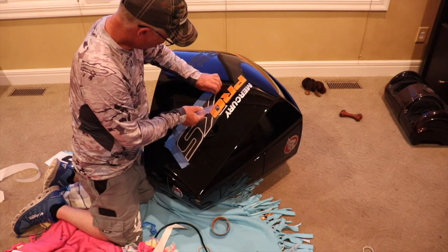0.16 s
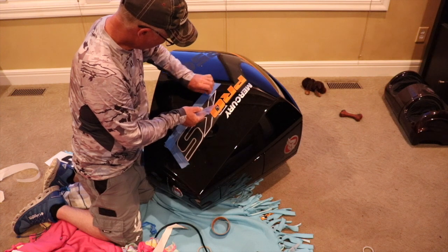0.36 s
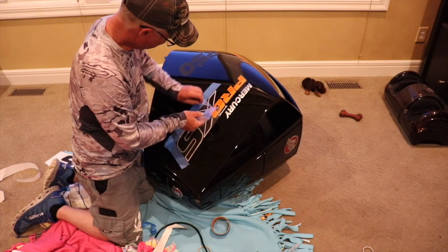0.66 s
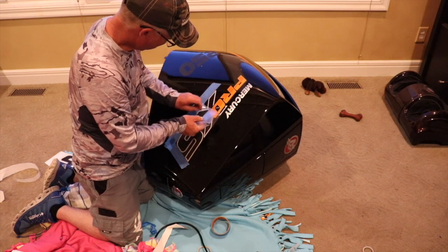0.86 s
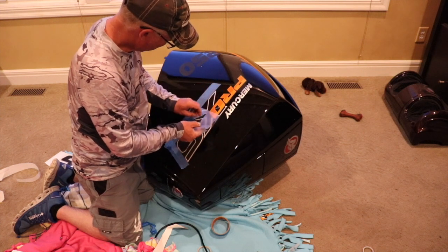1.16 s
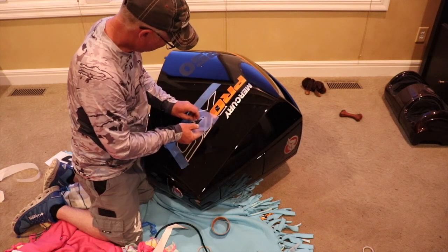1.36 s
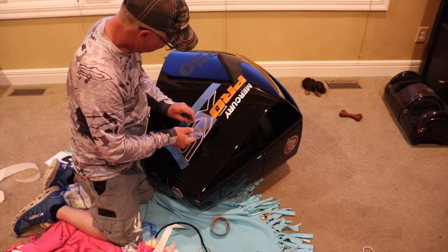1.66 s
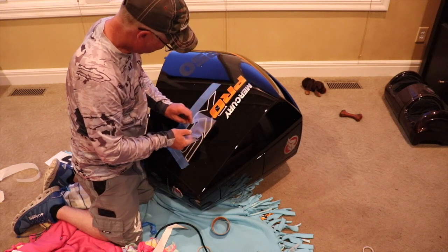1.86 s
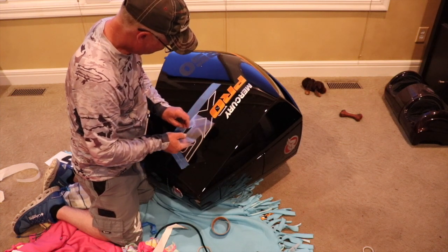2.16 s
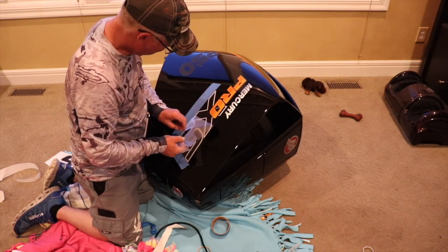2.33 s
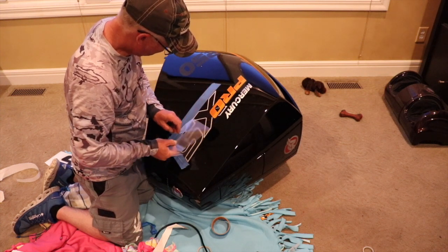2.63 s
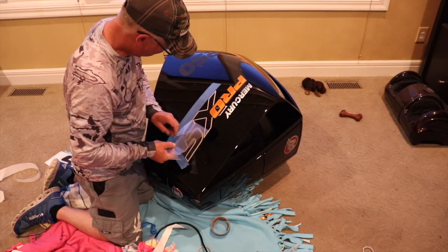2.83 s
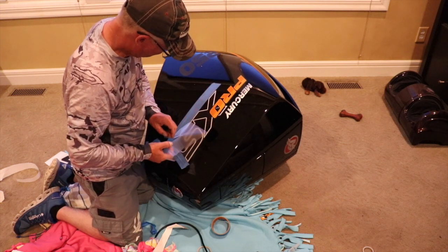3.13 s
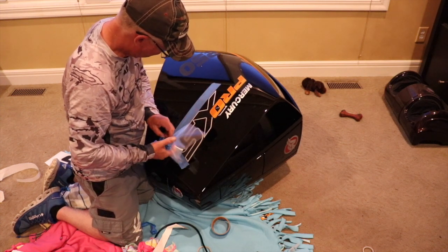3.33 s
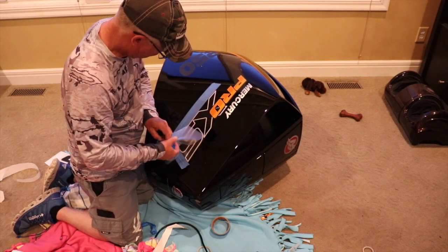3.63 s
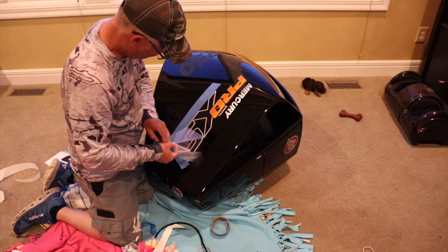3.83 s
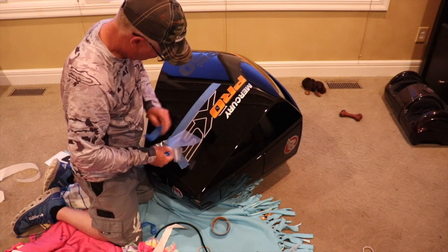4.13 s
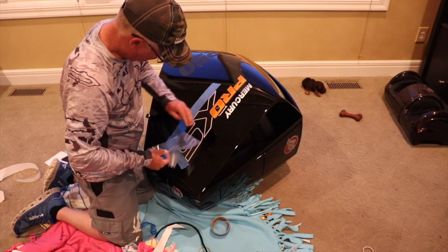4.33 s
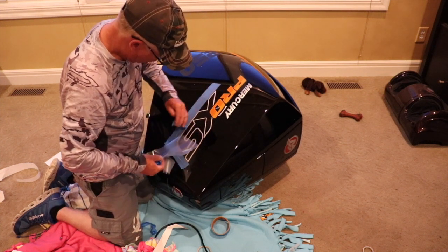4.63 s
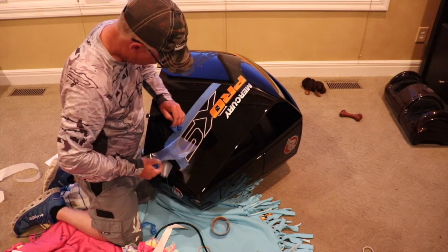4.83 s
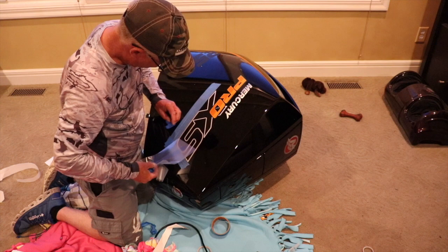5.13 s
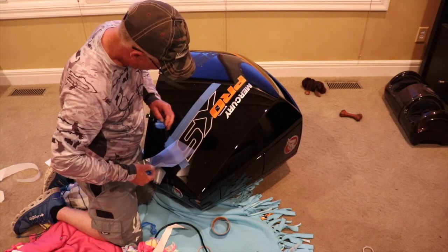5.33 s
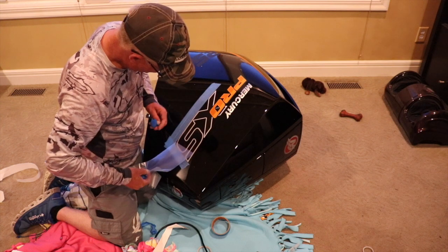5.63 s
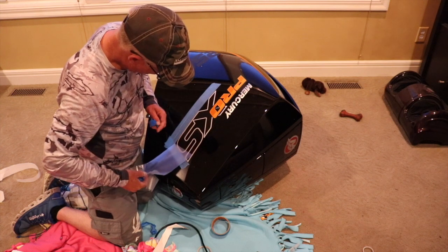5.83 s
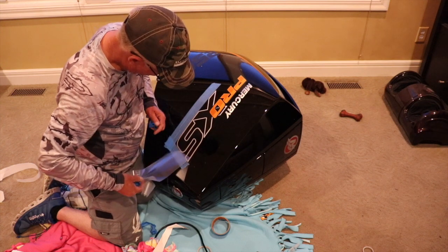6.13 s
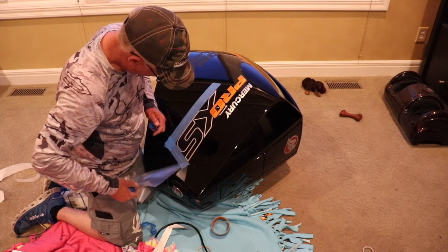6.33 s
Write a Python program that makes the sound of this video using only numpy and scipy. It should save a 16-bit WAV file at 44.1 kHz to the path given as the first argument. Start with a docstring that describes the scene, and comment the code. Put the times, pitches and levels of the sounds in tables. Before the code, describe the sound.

In a bare room with a faint steady hiss, hands pull tape and stiff film off a hollow shell. Bright snaps and sticky crackles come in uneven bursts with brief lulls, thickest a little past the middle. The tugs draw a soft hollow resonance from the shell, and each sound has a slight fluttering echo. The microphone seems fairly near.

```python
"""Peeling a decal

Hands peel stiff backing film and masking tape off a decal on a fibreglass cover in a bare carpeted room.
Creases snap, the glue lets go in runs of tiny crackles and a low, hollow ring comes with each tug. Each
sound stutters in fading, inverted repeats every 1/60 s, laid over the room's sound and a faint hiss."""
import sys
import numpy as np
from scipy import signal
from scipy.fft import rfft, irfft, next_fast_len
from scipy.io import wavfile
from scipy.ndimage import uniform_filter1d

SR = 44100
rng = np.random.default_rng(int(sys.argv[2]) if len(sys.argv) > 2 else 0)


def unload_audio(sound):
    """Save the sound as a 16-bit wav file, at the path given as the first command line argument."""
    columns = np.transpose(np.atleast_2d(sound))
    # keep every value between -1 and 1, then stretch to whole-number steps
    steps = np.round(np.clip(columns, -1, 1) * 32767)
    wavfile.write(sys.argv[1], SR, steps.astype(np.int16))


N = 286209

# The colour of the hiss. Each row: frequency in Hz, relative density in dB.
HISS_COLOUR = [(25, 9), (60, 8.5), (130, 6.5), (220, 4.5), (380, 2), (600, -5.5), (1700, -8), (2500, -9.5),
               (6000, -13), (11000, -21), (16500, -17.5)]
# Stereo width of hiss and tail. Each row: frequency in Hz, left-right likeness from 0 to 1.
STEREO_LIKENESS = [(60, 0.44), (250, 0.95), (500, 0.61), (1000, 0.044), (2000, 0.035), (15000, 0.0061)]
# Creases buckling. Each row: time in seconds, dry peak in dB, centre in Hz, spread in octaves.
CREASES = [(0.019, -30.5, 2270, 0.62), (0.181, -40.5, 6200, 0.34), (.2699, -26, 6060, .6),
           (.2785, -24, 7400, 0.34), (0.287, -9.5, 6900, 0.57), (0.752, -32, 6000, 0.36),
           (0.759, -29, 6400, 0.45), (0.7763, -17, 5500, 0.58), (.7961, -20, 2000, 0.88),
           (.8179, -11.5, 6300, 0.49), (.8293, -19, 5500, 0.39), (0.8486, -8, 5060, 0.68),
           (0.8715, -22, 5000, 1.1), (0.88, -18, 7000, 0.67), (1.0211, -29, 3870, 0.43),
           (1.2873, -42.5, 3500, 0.54), (1.4162, -31.5, 5200, 0.69), (1.4222, -38, 3480, 0.26),
           (1.425, -19.5, 3070, 0.3), (1.4376, -28, 2160, 0.88), (1.4708, -22, 2050, 0.97),
           (1.5045, -48, 1900, 0.98), (1.7364, -31.5, 4860, 0.54), (1.8643, -36, 8100, 0.88),
           (1.867, -28, 10600, 0.33), (1.8835, -33.5, 9800, 0.76), (2.2465, -23, 5800, .8),
           (2.2501, -20.5, 5230, 0.71), (2.2739, -12, 7060, 0.77), (2.5586, -37, 7600, 1.1),
           (2.6466, -40, 7200, 0.74), (2.678, -45, 1920, 0.15), (3.2, -47, 2250, 0.21),
           (3.2201, -41.5, 5900, 0.41), (3.2621, -41, 4700, .5), (3.2718, -35, 4930, 0.19),
           (3.2784, -46, 4900, .12), (3.2934, -32.5, 5030, 0.15), (3.2954, -35, 4700, 0.12),
           (3.3018, -41, 4770, 0.12), (3.361, -38, 4200, .8), (3.3675, -36, 4300, .7),
           (3.377, -14.5, 4700, .6), (3.3933, -7.5, 4380, 0.68), (3.5963, -23.5, 10900, 0.45),
           (3.732, -37, 2900, 0.66), (3.7523, -34, 2700, 0.88), (3.769, -36, 5170, 0.43),
           (3.8172, -31, 3500, 0.88), (3.8735, -21, 2920, 1), (3.8992, -24, 3900, 0.85),
           (3.9063, -20.5, 2640, 0.77), (3.9151, -21.5, 2320, 0.65), (3.9236, -23, 2350, 0.65),
           (4.0009, -25.5, 2780, 1), (4.0045, -25, 5440, 0.65), (4.0637, -20.5, 2130, 0.42),
           (4.0935, -21, 2620, 0.48), (4.1066, -17, 11000, 1), (4.12, -14, 9000, 0.65),
           (4.23, -28, 3230, 0.81), (4.2509, -33, 4300, 0.84), (4.3859, -41, 7040, 0.62),
           (4.4864, -27, 3520, 0.3), (4.4973, -47, 4100, 0.42), (4.56, -36, 6200, 0.32),
           (4.6663, -39, 4200, 0.25), (4.6879, -32, 6800, 0.34), (4.6992, -40, 6000, 0.46),
           (4.7299, -24.5, 4500, 0.3), (4.7462, -25.5, 4700, 0.38), (4.9155, -28, 6200, 0.91),
           (4.9232, -26, 5260, 0.56), (4.9325, -21, 11400, 0.3), (4.9352, -24, 10700, 0.56),
           (4.9446, -20, 8200, 0.74), (4.9516, -27, 7640, .5), (4.9574, -16, 7400, 0.64),
           (4.9617, -7.5, 7800, 0.51), (5.082, -36, 1560, 0.2), (5.145, -34.5, 1750, 0.43),
           (5.1719, -31.5, 7360, 0.77), (5.2124, -28, 4230, 0.3), (5.2313, -28, 9000, 0.65),
           (5.2802, -34.5, 3930, 0.65), (5.6233, -32, 3940, 0.76), (5.776, -43, 2400, .4),
           (5.903, -38.5, 3220, 0.65), (5.9876, -35, 9800, 0.88), (6.251, -46, 7260, 0.7),
           (6.2593, -22.5, 7400, .6), (6.2767, -28.5, 7200, 0.65), (6.349, -38, 6500, 0.75),
           (6.3637, -24, 7200, .6), (6.3805, -29, 6660, .6), (6.4385, -30, 6000, 0.88),
           (6.448, -28, 6200, .7), (6.4516, -22.5, 2930, 0.54), (6.4544, -18.5, 4800, 0.58)]
# Tugs at the glue. Each row: peak time in seconds, rise and base fall in dB per second, crackle
# centre in Hz, then the dry peak levels in dB of crackle, fine film, broad folds and hollow ring.
GLUE_TUGS = [(0.028, 298, 189, 2580, -66, -72, -63.5, -61.5), (.19, 300, 60, 5000, -81, -84, -85, -91),
             (0.288, 1198, 478, 4600, -29, -31.5, -36.5, -42),
             (0.318, 900, 98, 4000, -44, -49.5, -45.5, -43), (0.629, 300, 43, 3300, -73, -67, -71, -59.5),
             (0.782, 510, 115, 2700, -42.5, -44, -49.5, -68),
             (0.829, 503, 102, 3520, -39, -36.5, -41.5, -48), (1.43, 896, 76, 3000, -69, -62.5, -55.5, -52),
             (1.474, 898, 314, 2830, -56, -80, -42.5, -40.5), (1.55, 300, 48, 2700, -93, -72, -83, -82),
             (1.736, 708, 114, 4030, -69, -61, -87, -85), (1.875, 900, 106, 4000, -61, -62.5, -67, -73),
             (2.268, 987, 340, 3470, -37, -37, -56.5, -54), (2.308, 600, 75, 3240, -55, -61.5, -57, -54),
             (2.67, 189, 100, 2140, -68.5, -69, -72, -62), (3.22, 306, 700, 2200, -66, -67, -92, -82),
             (3.295, 502, 200, 4260, -56, -58, -56.5, -85), (3.34, 300, 60, 2600, -55.5, -66, -73, -75),
             (3.381, 1100, 109, 3000, -37, -43, -45, -49.5), (3.61, 294, 83, 3600, -59.5, -54.5, -67, -66),
             (3.74, 150, 170, 2440, -61.5, -79, -59, -64), (3.832, 712, 91, 2400, -47, -50, -50, -59.5),
             (3.904, 803, 96, 2510, -44.5, -53, -50.5, -43), (4.07, 702, 244, 2350, -51, -53.5, -69, -66),
             (4.122, 900, 157, 2940, -45, -51, -52, -52), (4.38, 91, 37, 3420, -66, -68.5, -69, -66),
             (4.483, 802, 63, 3340, -65, -64, -60, -59.5), (4.738, 244, 354, 4070, -48, -49, -59, -57),
             (4.79, 200, 43, 3740, -59.5, -65, -59, -59.5),
             (4.961, 350, 115, 4700, -42.5, -40.5, -62.5, -56),
             (5.22, 99, 62, 4050, -59, -60.5, -61.5, -67.5), (5.623, 280, 96, 4500, -59, -65, -67.5, -69),
             (5.77, 148, 162, 3200, -62.5, -65, -70.5, -74),
             (5.899, 400, 147, 2980, -61.5, -60.5, -68.5, -69),
             (6.038, 200, 166, 3000, -61.5, -67.5, -78, -96),
             (6.272, 695, 172, 4260, -52.5, -52, -64.5, -63),
             (6.38, 250, 280, 4800, -48.5, -55, -58.5, -57), (6.453, 1793, 398, 2760, -39.5, -45, -53, -48)]
# Multipliers on a tug's fall rate, in order: crackle, film, folds, ring.
FALL_FACTORS = [0.9, 1.3, 0.73, 2.05]
# The textures of crackle, film and folds. Each row: spread in octaves, grains per second.
GRAIN_TEXTURES = [(0.332, 1000), (.4, 1700), (.55, 600)]
# Pitches of the low, hollow ring heard with each tug.
# Each row: pitch in Hz, relative level in dB, seconds to fall 60 dB.
RING_PITCHES = [(228, -12, .1), (269, -3, .36), (330, -4, .07), (392, -1, .08), (447, -1, .06),
                (520, -2, .06), (696, -6, .08)]
# First reflections. Each row: left and right delay in seconds, left and right level in dB.
REFLECTIONS = [(.0014, .0015, -10, -8), (.004, .0032, -16, -15), (.0074, .0069, -15, -13),
               (.0112, .0108, -17, -14), (.0188, .0188, -16, -16), (.0283, .026, -18, -15)]
# The length of the room's tail. Each row: frequency in Hz, seconds to fall 60 dB.
TAIL_DECAY = [(150, 1), (400, 1), (1000, 0.4), (2800, 0.45), (7000, 0.61), (15000, 0.15)]
# The colour of the tail. Each row: frequency in Hz, relative level in dB.
TAIL_COLOUR = [(150, -5), (600, -2), (2000, 0), (6000, 0), (11000, 1), (16000, 1)]
# The microphone's tone. Each row: frequency in Hz, gain in dB.
MICROPHONE_EQ = [(25, -40), (60, -20), (120, -8), (250, 0), (2000, 0), (9000, 0), (11000, -4), (13000, -1),
                 (16000, -2)]

RIGHT_LAGS_S = (.00001, .00003, .00005)  # right channel's lag for each of three places on the sheet
HISS_DB, LEFT_TREBLE_DB, TOP_HZ = -60, -2.5, 15900
FILM_HZ, FOLDS_HZ = 11000, 1188
SAG_OCTAVES_PER_S = 0.25  # the crackle dulls after each peak
STUTTER_S, STUTTER_DB = 1 / 60, -7.5  # spacing of the repeats, level step from one to the next
TAIL_DB = -2  # the tail's energy against the direct sound
BLOOM_DB, BLOOM_S = 0.5, 0.037  # lift at the start of the tail, and its time constant


def gain_of(db):
    return 10 ** (np.asarray(db) / 20)


def unit_rms(x):
    return x / np.sqrt(np.mean(x ** 2) + 1e-20)


def curve_at(points, hz):
    """A table's value at hz, interpolated on a log-frequency axis."""
    f, value = np.transpose(points)
    return np.interp(np.log(hz + 1), np.log(f + 1), value)


def coloured(x, gain):
    """Filters x by gain(Hz)."""
    size = next_fast_len(x.shape[-1])
    return irfft(rfft(x, size) * gain(np.fft.rfftfreq(size, 1 / SR)), size)[..., :x.shape[-1]]


def bell(hz, octaves):
    """A bell EQ curve with wide skirts and a pink tilt."""
    return lambda f: (1 + (np.log2((f + 1) / hz) / octaves) ** 2 / 6) ** -2 / np.sqrt(f + 100)


def stereo_noise(seconds, db_field, size):
    """Noise shaped by db_field(Hz, s), narrow in the bass and wide in the treble."""
    hop, hz = size // 4, np.fft.rfftfreq(size, 1 / SR)[:, None]
    frames = round(seconds * SR) // hop + 5
    a, b, c, d = rng.standard_normal((frames, len(hz), 4)).T
    left, unrelated = a + 1j * b, c + 1j * d
    likeness = np.clip(curve_at(STEREO_LIKENESS, hz), 0, 1)
    spectra = np.array([left, likeness * left + np.sqrt(1 - likeness ** 2) * unrelated])
    spectra *= gain_of(db_field(hz, np.arange(frames) * hop / SR))
    return signal.istft(spectra, nperseg=size, noverlap=size - hop)[1][:, :round(seconds * SR)]


def hiss():
    """A faint, steady bed of noise, weighted to the lows."""
    noise = stereo_noise(N / SR + .1, lambda hz, s: curve_at(HISS_COLOUR, hz), size=4096)
    return gain_of(HISS_DB) * unit_rms(noise[:, :N])


def crease_snaps():
    """Each crease buckles with a sharp tick and a millisecond of rattle, coloured by its size."""
    out, t = np.zeros(N + 600), np.arange(-100, 500) / SR
    rattles = rng.standard_normal((len(CREASES), len(t)))
    for (s, db, hz, octaves), rattle in zip(CREASES, rattles):
        burst = (t == 0) + .3 * rattle * (t > 0) * np.exp(-abs(t) / .0008)
        burst = coloured(burst, bell(hz, octaves))
        at = max(round(s * SR) - 100, 0)
        out[at:at + len(t)] += gain_of(db) * burst / abs(burst).max()
    return out[:N]


def pull():
    """Tugs swell and die away, adding in power. Returns the crackle's centre in Hz and four gains."""
    t = np.arange(0, N / SR + .002, .001)
    power, weighted_octave = 0, 0
    for s, rise, fall, hz, *peak_db in GLUE_TUGS:
        before, after = np.maximum(s - t, 0), np.maximum(t - s, 0)
        tug_power = gain_of(np.c_[peak_db] - rise * before - fall * np.c_[FALL_FACTORS] * after) ** 2
        power += tug_power
        weighted_octave += tug_power[0] * (np.log2(hz) - SAG_OCTAVES_PER_S * after)
    crackle_hz = 2 ** (weighted_octave / power[0])
    return [np.interp(np.arange(N) / SR, t, curve) for curve in (crackle_hz, *np.sqrt(power))]


def glue_slips(per_s):
    """The glue lets go in random ticks of either sign; a few are large."""
    size = gain_of(4 * np.minimum(rng.exponential(1, N), 3))
    return unit_rms(size * rng.choice([-1., 1.], N) * (rng.random(N) < per_s / SR))


def sheet_grains(hz, octaves, per_s):
    """Slips heard in the sheet: ticks through a bell centred on hz, steady or sweeping."""
    f, s, spectra = signal.stft(glue_slips(per_s), SR, nperseg=256)
    centre_hz = np.interp(s, np.arange(N) / SR, hz * np.ones(N))
    tone = bell(centre_hz, octaves)(f[:, None])
    return unit_rms(signal.istft(spectra * tone / np.linalg.norm(tone, axis=0), nperseg=256)[1][:N])


def hollow_ring(envelope):
    """A low, hollow ring under each tug: ticks set off a cluster of fading sines."""
    t = np.arange(SR // 2) / SR
    ring = sum(gain_of(db - 60 * t / t60) * np.sin(2 * np.pi * hz * t) for hz, db, t60 in RING_PITCHES)
    ring = signal.lfilter(*signal.butter(2, 170, "high", fs=SR), ring)
    return signal.oaconvolve(envelope * glue_slips(per_s=600), ring / np.linalg.norm(ring))[:N]


def room_and_stutter(x, right_lag_s):
    """The direct sound and its fading, inverted repeats, laid over the room's reflections and tail."""
    t = np.arange(SR) / SR
    tail = stereo_noise(1, lambda hz, s: curve_at(TAIL_COLOUR, hz) - 60 * s / curve_at(TAIL_DECAY, hz),
                        size=256)
    tail *= np.clip(t / .006, 0, 1) * gain_of(BLOOM_DB * np.exp(-t / BLOOM_S))
    tail = gain_of(TAIL_DB) * tail / np.linalg.norm(tail[0])
    taps = np.zeros_like(tail)
    taps[:, 0] = 1
    for left_s, right_s, *db in REFLECTIONS:
        jitter = rng.integers(-12, 12)
        taps[[0, 1], [round(left_s * SR) + jitter, round(right_s * SR) + jitter]] += gain_of(db)
    for repeat in range(1, 8):
        taps[:, round(repeat * STUTTER_S * SR)] -= gain_of(repeat * STUTTER_DB)
    left, right = signal.fftconvolve(x[None], taps, axes=1)[:, :N]
    # the left side is a touch duller, the right a touch later
    left = coloured(left, lambda f: gain_of(LEFT_TREBLE_DB * f / (f + 1500)))
    right = coloured(right, lambda f: np.exp(-2j * np.pi * f * right_lag_s))
    return np.array([left, right]) + signal.fftconvolve(x[None], tail, axes=1)[:, :N]


def scene():
    """Grains and ring ride the pull; with the snaps they play into the room, over the hiss."""
    bed = hiss()
    crackle_hz, *grain_gains, ring_gain = pull()
    layers = zip(grain_gains, (crackle_hz, FILM_HZ, FOLDS_HZ), GRAIN_TEXTURES)
    sheet = sum(gain * sheet_grains(hz, *texture) for gain, hz, texture in layers)
    ring = hollow_ring(ring_gain)
    # every few milliseconds the sheet sounds from any of three places; the ring comes from all three
    place = np.repeat(rng.integers(0, 3, N // 200 + 1), 200)[:N]
    crossfades = uniform_filter1d(1. * (place == np.arange(3)[:, None]), size=40)
    parts = (sheet + crease_snaps()) * crossfades + ring / np.sqrt(3)
    return sum(room_and_stutter(part, lag) for part, lag in zip(parts, RIGHT_LAGS_S)) + bed


def record(dry):
    """The microphone thins the bass and dips the highs; a steep low-pass trims the very top."""
    heard = coloured(dry, lambda f: gain_of(curve_at(MICROPHONE_EQ, f)))
    low_pass = signal.firwin(511, TOP_HZ, window=("kaiser", 9), fs=SR)
    return signal.oaconvolve(heard, low_pass[None], "same")


dry = scene()
out = record(dry)
unload_audio(out)
```